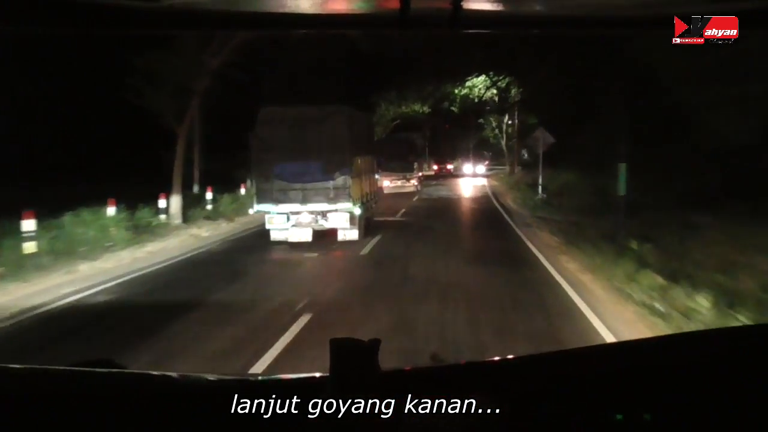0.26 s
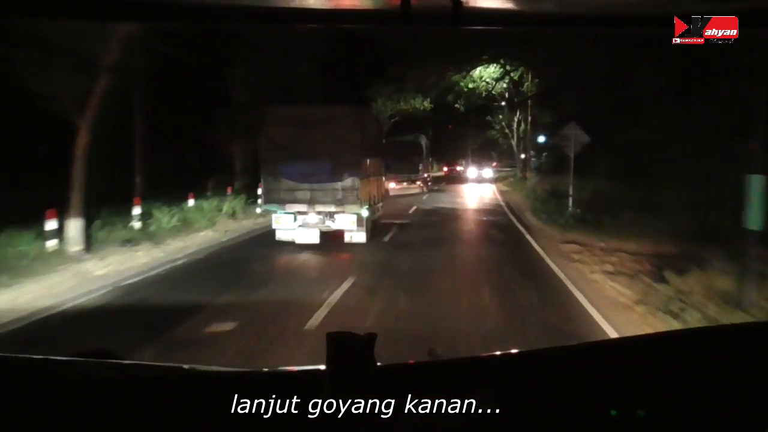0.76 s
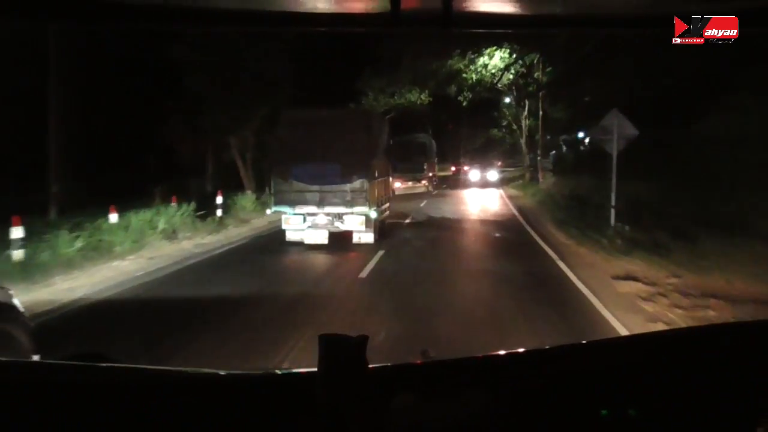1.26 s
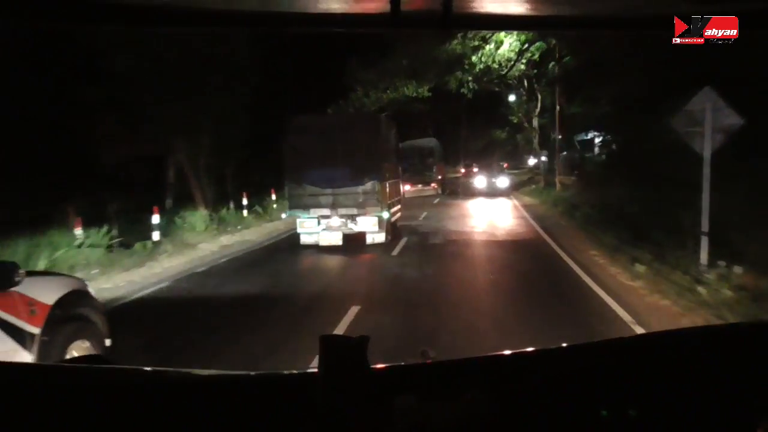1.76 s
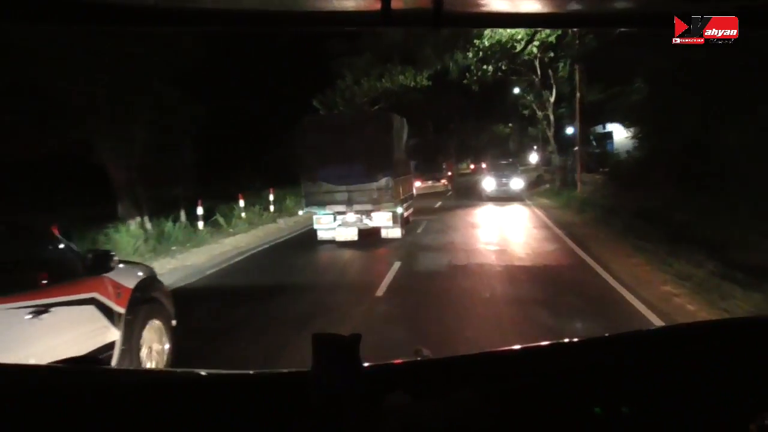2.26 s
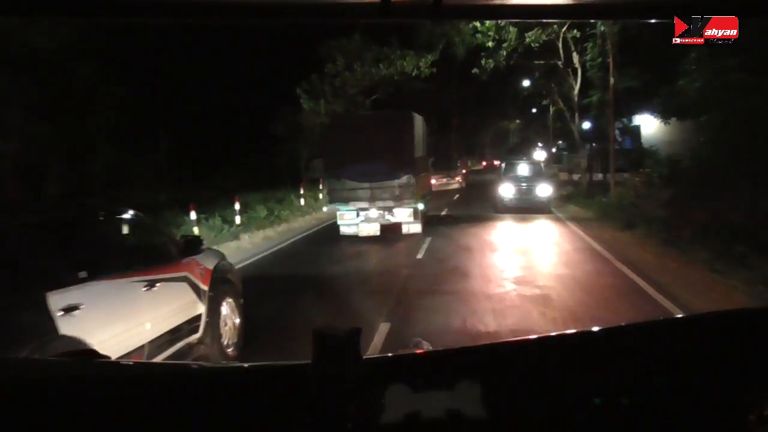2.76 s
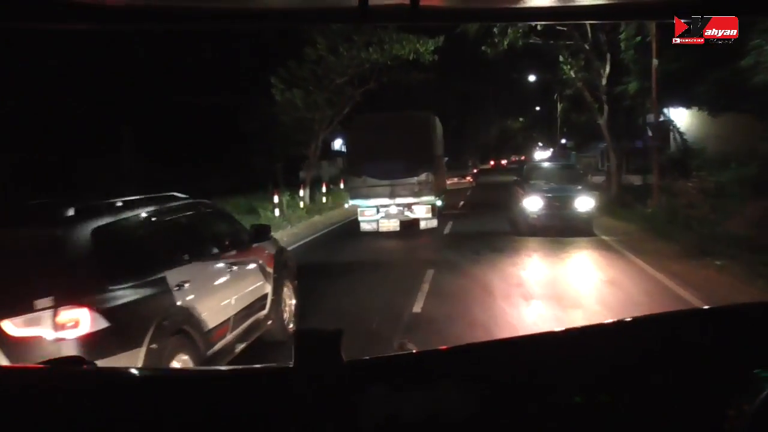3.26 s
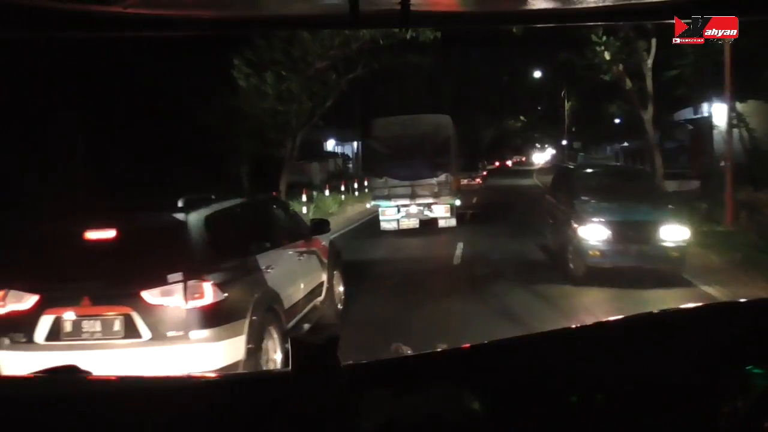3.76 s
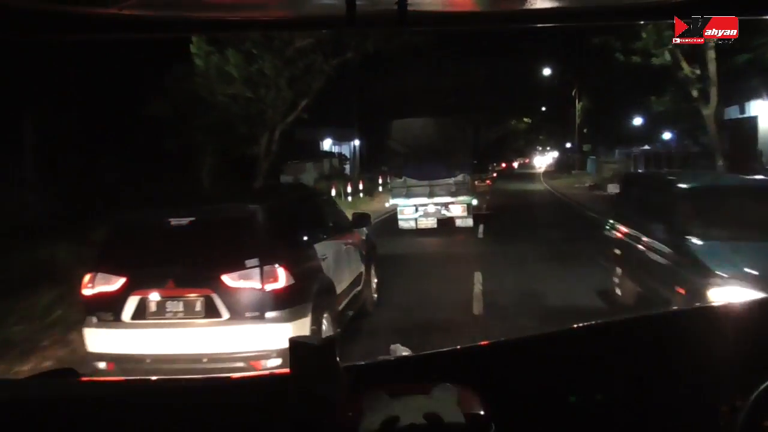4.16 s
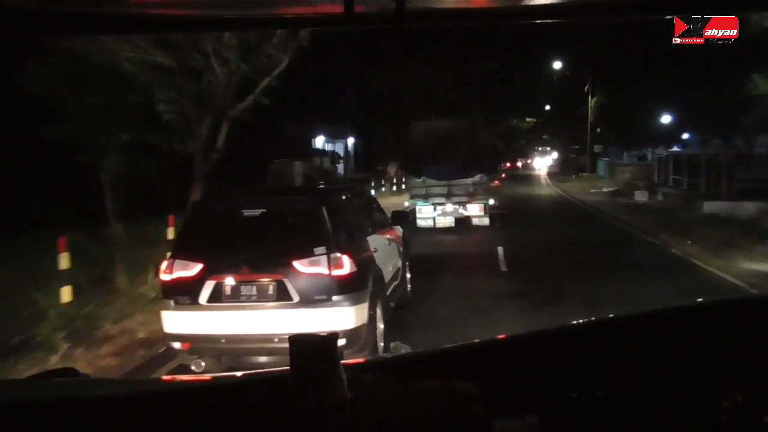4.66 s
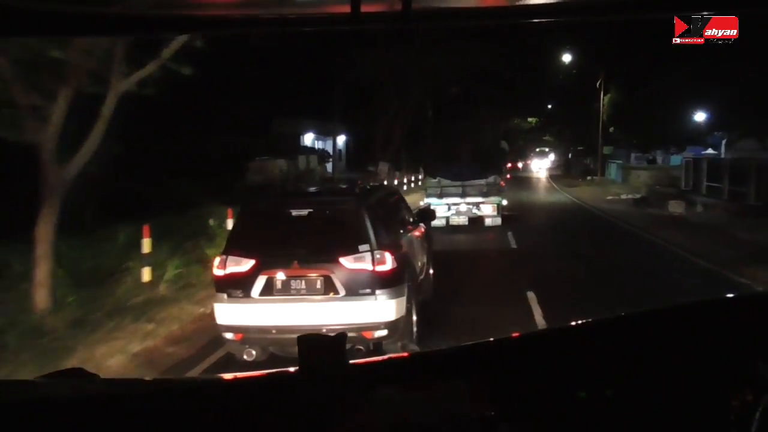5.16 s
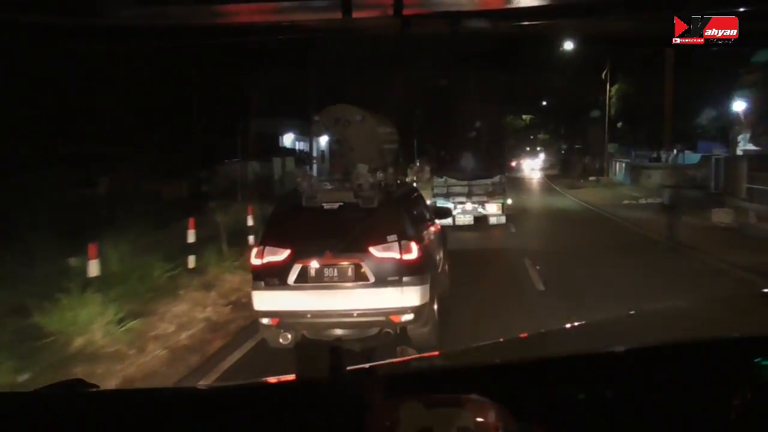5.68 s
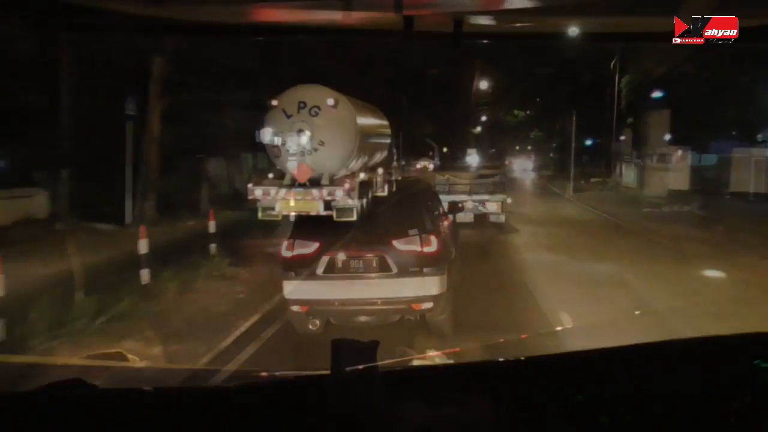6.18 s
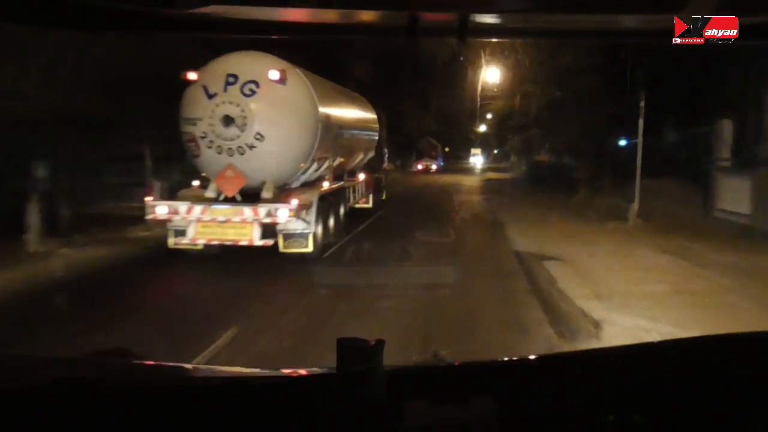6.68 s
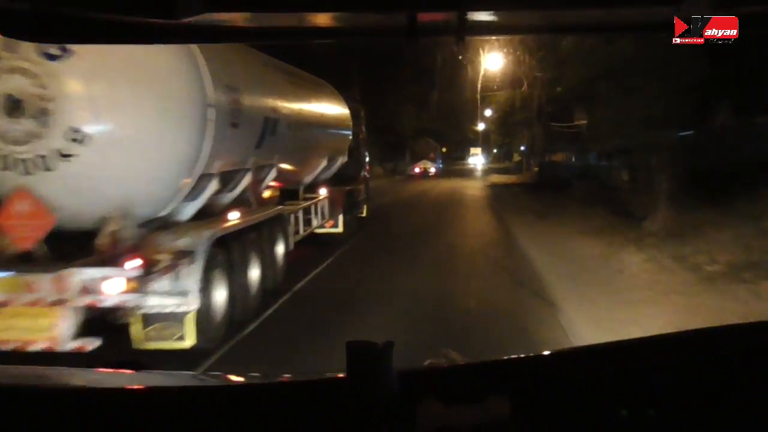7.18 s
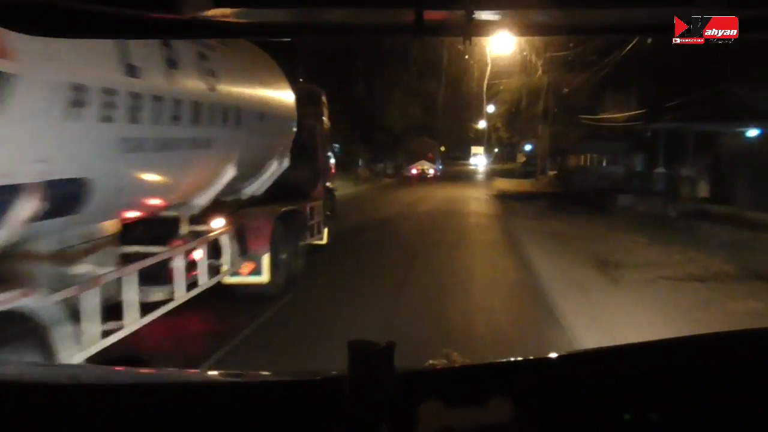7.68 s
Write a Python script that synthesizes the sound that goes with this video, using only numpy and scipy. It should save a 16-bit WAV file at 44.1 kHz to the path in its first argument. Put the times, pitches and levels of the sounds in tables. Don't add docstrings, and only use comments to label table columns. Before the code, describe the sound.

Dashboard stereo pickup in a moving bus: muffled low rumble dominates, with engine drone, weak gear whine and soft window hiss. Over it a sharp flasher tick repeats, each followed by a softer release click. Two hard thuds and several plastic cracks come around five seconds; then a crossfade brings a louder, faster stretch with its own ticking, panel drone, a deep jolt and thin snapping pings.

```python
import sys
import numpy as np
from scipy import signal
from scipy.fft import rfft, irfft
from scipy.io import wavfile
from scipy.ndimage import uniform_filter1d

SR = 44100
rng = np.random.default_rng(int(sys.argv[2]) if len(sys.argv) > 2 else 0)


def ratio(d):
    e = np.asarray(d, float) / 20
    return 10 ** e


def master(y):
    cut = np.clip(np.atleast_2d(y).T, -1, 1)
    pcm = np.round(cut * 32767)
    wavfile.write(sys.argv[1], SR, pcm.astype(np.int16))


N = 349713

# start_s, level_db
FLOOR_BOOM = [(0.0, -21.5), (0.09, -21), (0.49, -23), (0.55, -22), (1.06, -24), (1.08, -23.5), (3.64, -27),
              (4.92, -24), (5.3, -26), (6.03, -19.5), (6.23, -20), (6.38, -16.5), (6.89, -17.5),
              (6.93, -14.5), (7.89, -19), (7.93, -16.5)]
# pitch_hz, level_db (per Hz)
FIRST_COLOUR = [(12, -46), (20, -8.5), (86, -6), (100, -7.5), (125, -1.5), (158, -8.5), (192, -6.5),
                (302, -13), (333, -17), (360, -19.5), (397, -21), (650, -26.5), (908, -27.5), (982, -32.5),
                (2200, -57), (2860, -83), (4840, -120)]
SECOND_COLOUR = [(12, -45), (20, -14.5), (127, -3), (192, -3.5), (225, -3), (253, -10.5), (327, -12.5),
                 (360, -18), (405, -16.5), (663, -24.5), (873, -26.5), (963, -30.5), (1240, -36),
                 (1700, -49.5), (2200, -51), (2860, -81), (4840, -120)]
# middle_s, length_s, lift_db
PASSING = [
    (6.6, 0.84, 1),
    (7.35, 0.72, 1.5),
]
# pitch_hz, likeness (1 = same)
LIKENESS = [(30, 0.94), (60, 0.94), (130, 0.99), (290, 0.91), (640, 0.79), (1410, 0.55), (3100, 0.37),
            (6820, 0.11), (15000, -0.18)]
# pitch_hz, left_minus_right_db
LEAN = [(25, 0), (60, -1), (180, -2.5), (550, -2.5), (1650, -1.5), (4970, 0), (15000, -3.5)]
# pitch_hz, level_db (per Hz)
WIND_COLOUR = [(820, 5), (1400, 8.5), (1780, -13), (2260, 5), (2670, -6.5), (3430, 0), (4170, -6.5),
               (6000, -31), (7000, -19), (9100, -46), (15400, -120)]
# middle_s, length_s, lift_db
GUSTS = [
    (0, 0.33, -3),
    (1.8, .7, 1.5),
    (3.6, 1.7, 5.5),
    (5.151, 0.68, 4),
    (6.35, 1, 2.5),
]
# pitch_hz, level_db (per Hz)
SIZZLE_COLOUR = [(2940, -3.5), (5000, -1.5), (5710, -5), (6520, -5), (6830, -5.5), (7440, -2.5),
                 (11100, -2), (14600, -10.5), (15500, -17.5)]
# middle_s, length_s, lift_db
SHAKES = [(0, 0.46, 2), (1.197, .35, 6.5), (1.453, 0.33, -4.5), (1.703, 0.43, 5), (1.896, 0.45, 8),
          (2.303, 0.34, -0.5), (2.999, 1, 5.5), (3.555, 1, 7), (3.836, 0.49, 2.5), (4.067, 0.52, 6),
          (5.1, 0.92, 0.5), (5.6, 0.37, -6.5), (5.95, .5, -1.5), (6.332, 0.94, 4), (7.02, 0.34, 4)]
# start_s, pitch_hz, level_db
FIRING = [(0, 131.7, -30), (.5, 126, -36), (1, 129, -26), (1.5, 127.2, -26), (2, 122, -31), (2.5, 119, -28),
          (3, 118, -28.5), (3.15, 117.9, -36), (4.1, 125.9, -36), (4.8, 127.1, -37.5), (5.6, 124.3, -42),
          (6.2, 128.1, -26), (6.5, 120, -26.5), (6.85, 126, -32.5), (7.4, 138, -33), (7.93, 128, -35)]
# start_s, pitch_hz, level_db
GEARS = [(0, 301, -33), (.25, 284.7, -29.5), (.35, 282.3, -53), (.55, 277.7, -34), (.9, 263.6, -37.5),
         (1.15, 260, -31.5), (1.5, 283.5, -36), (1.8, 298.6, -29), (2.1, 312.6, -50), (2.6, 304, -46),
         (2.7, 303.4, -38.5), (2.9, 302, -44), (3.1, 301.8, -31), (3.3, 303, -41), (3.55, 304.4, -37),
         (3.7, 305, -40.5), (3.8, 308, -36.5), (4.0, 314, -38), (4.25, 314, -35.5), (4.4, 286.9, -31.5),
         (4.62, 259, -34), (4.7, 288, -40), (5.2, 286.4, -36.5), (5.6, 287, -29), (6.0, 286.5, -35.5),
         (6.4, 284.7, -30), (6.7, 283.2, -33.5), (7.2, 278.8, -33.5), (7.93, 298.2, -32)]
# start_s, pitch_hz, level_db
TREAD = [(.3, 900, -56), (1.8, 900, -54), (2.5, 908, -56), (3.1, 914, -53), (3.7, 908, -54),
         (4.4, 905, -57), (4.8, 900, -60)]
# start_s, end_s, pitch_hz, level_db
PANELS = [(0, 0.363, 227, -30), (1.0, 2.25, 230, -38), (.45, 0.77, 120, -25), (2.5, 3.95, 199, -33.5),
          (5.78, 5.93, 215, -25.5), (6.3, 6.55, 225, -21), (6.55, 6.85, 228, -26), (6.85, 7.15, 227, -22.5),
          (7.15, 7.93, 227, -29), (7.2, 7.4, 180, -30), (6.3, 6.5, 183, -37), (6.65, 6.85, 150, -27),
          (7.55, 7.93, 175, -29.5), (4.85, 5.2, 215, -35.5)]
# start_s, peak_db, dull_part_db,
# fade_s (time to fall 60 dB)
RATTLES = [(0, -41.5, 6, .15), (0.2422, -45.5, 12, 0.17), (0.4638, -48, 10, 0.13), (1.1309, -34, -15, 0.06),
           (1.15, -40, -20, .5), (1.27, -38.5, -8, 0.35), (1.6654, -32.5, -3, 0.16),
           (1.6815, -31, -10, .15), (3.0624, -40, -2, .12), (4.083, -36, -19, 0.15),
           (4.9193, -24, -3, 0.16), (5.1761, -26, -3, 0.097), (5.183, -24, 0, 0.17), (5.3743, -44, 8, .1),
           (5.729, -35, -2, 0.26), (5.7613, -37, 6, 0.12), (5.942, -28.5, -3, 0.15),
           (6.122, -28, -10, 0.16), (6.2855, -19.5, -28, 0.091), (6.5378, -38.5, 10.5, 0.21),
           (6.6588, -41, -25, 0.15), (7.0243, -36, 2, 0.14), (7.045, -35.5, 4, 0.2), (7.2559, -35, 2, 0.22),
           (7.3727, -37, 3, 0.41), (7.668, -37, -16, 0.15), (7.8634, -38, -7, 0.095)]
# pitch_hz, level_db
RATTLE_BRIGHT = [(5500, -23.5), (6300, -15), (7000, -9), (8500, -8.5), (10500, -7.5), (13000, -15),
                 (14500, -23), (15600, -30)]
# pitch_hz, level_db
RATTLE_DULL = [(400, -20), (700, 8), (1500, -0.5), (2500, -5), (3900, -1), (5200, -3.5), (6500, -19)]
# start_s, peak_db, pitch_hz
KNOCKS = [
    (.25, -46, 1330),
    (.47, -47, 1330),
    (.47, -46, 1080),
    (.9, -44, 1330),
    (.9, -54, 1950),
]
# start_s, peak_db, #
# centre_hz, fade_s (time to fall 60 dB)
THUDS = [(.02, -52, 4400, .8), (0, -46, 1800, .2), (.355, -46.5, 1900, 0.35), (1.879, -41.5, 1100, 0.21),
         (4.006, -41, 930, 0.17), (4.917, -26, 680, 0.12), (4.917, -38, 4000, .14), (4.917, -39, 1300, .18),
         (5.178, -29, 740, 0.17), (5.176, -41, 1200, 0.15), (5.177, -35, 7100, 0.14),
         (5.176, -39.5, 3000, 0.13), (7.29, -26, 760, .35), (6.55, -31, 720, .4), (7.37, -33, 1040, 0.78),
         (7.33, -17, 80, .6)]
# middle_s, length_s, pitch_hz, level_db
BOOMS = [(.17, .16, 130.3, -25), (4.17, .2, 128.6, -29.5), (4.38, .16, 122, -27), (4.56, .18, 123.1, -26),
         (4.8, .16, 128, -22.5), (5.0, .24, 127.8, -27), (5.5, .2, 125.4, -28.5), (5.7, .16, 128.4, -23.5),
         (6.0, .18, 132, -21.5), (7.05, .24, 125, -20), (7.28, .16, 136.6, -19), (7.47, .16, 136.5, -23)]
# first_pull_s, flashes, left_minus_right_db
FLASHERS = [
    (.2559, 11, -2.5),
    (5.8608, 4, -5.5),
]
PULL_FORCE = [-1.5, -0.95, 0, 0.72, -0.93, -0.64, 1.05, -1.1, 0.56, -0.13, 0.17, 0.53, 1.6, -0.29, -1.6]
DROP_FORCE = [0, 0, .5, -0.38, 0, 0.056, 0.97, 0.94, 0.34, 0, 0, -0.012, -0.12, 0.068, 0]
# pitch_hz, level_db, fade_s (time to fall 60 dB)
PULL_MODES = [(3400, -10.5, .1), (3468, -8.5, .12), (3575, -8, .11), (3655, -3, .13), (3765, -1.5, .09),
              (3865, -1.5, .1), (3917, -10, .1), (4064, -4, .105), (4198, -6, .12), (4335, -10, .1),
              (4393, -7.5, .12), (4605, -13.5, .1), (4866, -17, .095), (12105, -12.5, .06)]
DROP_MODES = [(2490, -2.5, .07), (2735, -5, .06), (3245, -3, .08), (3489, -6, .07), (3660, -6, .09),
              (3769, 0, .13), (3845, 0, .13), (4270, -6, .06), (4760, -8, .05), (6290, -9, .06),
              (6500, -6, .06), (7230, -9, .06), (7746, -9, .06), (12100, -5, .06)]
# delay_s, level_db
PULL_BOUNCES = [(0, 11), (.00435, 14), (.00826, 8), (.01257, 14.5), (.02045, 5), (.02742, 8), (.0389, 2)]
DROP_BOUNCES = [(0, 12), (.0061, 5), (.01214, 8.5), (.0164, 8), (.0233, 2), (.03, -2)]
# pitch_hz, level_db
PULL_BUZZ = [(3000, -20), (3600, 4), (4600, -1), (5500, -14), (6100, -26), (6900, -10.5), (8200, -4.5),
             (9500, -12), (10800, -14), (12000, -8), (12700, -30)]
DROP_BUZZ = [(2200, -14), (3700, -5), (5400, -19), (6500, -7), (7700, -10), (10500, -14), (12000, -14),
             (12800, -38)]
# start_s, peak_db, left_minus_right_db
SNAPS = [(1.2815, -26, 0), (3.5483, -23, 1), (3.565, -28, 0), (4.4926, -18.5, 2), (4.769, -20, 2),
         (5.1335, -21, 0.0), (5.321, -28, 0.0), (5.4844, -28, 4), (5.6396, -33, 0.5)]
# pitch_hz, level_db
SNAP_COLOUR = [(1000, -25), (1700, 2.5), (5000, -1), (9000, -4.5), (14500, -14), (15600, -30)]
# start_s, peak_db, left_minus_right_db
PINGS = [
    (6.915, -22, 0.0),
    (6.9576, -29, -2.0),
    (7.0848, -35, -2.5),
    (7.209, -26, -2.0),
    (7.266, -32, -1.0),
]
# from_hz, to_hz, level_db (against the tick)
MASKED = [(5750, 6350, -27), (12550, 13100, -30), (13100, 13800, -29), (13800, 14500, -37)]

FADE_S = (4.4, 6.86)


def evened(x):
    return x / np.sqrt(np.mean(x ** 2) + 1e-20)


def read(points, hz):
    f, value = np.transpose(points)
    return np.interp(np.log(hz + 1), np.log(f + 1), value)


def curve(rows, t):
    s, *columns = np.transpose(rows)
    return [np.interp(t, s, c) for c in columns]


def blend(pair, t):
    return np.interp(t, FADE_S, pair)


def humps_db(rows, t):
    total = 0
    for s, length, db in rows:
        total = total + db * np.cos(np.pi * np.clip((t - s) / length, -.5, .5)) ** 2
    return total


def add(mix, s, sound):
    part = mix[:, round(s * SR):][:, :sound.shape[1]]
    part += sound[:, :part.shape[1]]


def panned(x, pan_db):
    return x * ratio(np.array([[pan_db / 2], [-pan_db / 2]]))


def aside(x, count):
    return np.array([x[0], np.roll(x[1], count)])


def noise(colour_db, size, patchy_db, flicker_db):
    hop = size // 4
    frames, hz = N // hop + 5, np.fft.rfftfreq(size, 1 / SR)
    a, b, c, d, patches = rng.standard_normal((frames, len(hz), 5)).T
    patches = uniform_filter1d(patches, size=4, axis=0)
    patches = evened(uniform_filter1d(patches, size=6, axis=1))
    flicker = evened(uniform_filter1d(rng.standard_normal(frames), size=3))
    same = np.clip(read(LIKENESS, hz), -1, 1)[:, None]
    lean = read(LEAN, hz)[:, None]
    left = a + 1j * b
    right = same * left + np.sqrt(1 - same ** 2) * (c + 1j * d)
    z = np.array([left * ratio(lean / 2), right * ratio(-lean / 2)])
    gain = ratio(colour_db(hz, np.arange(frames) * hop / SR))
    gain /= np.sqrt((gain ** 2).mean(0))
    z = z * gain * ratio(patchy_db * patches + flicker_db * flicker)
    return evened(signal.istft(z, nperseg=size, noverlap=size - hop)[1][:, :N])


def road():
    def colour_db(hz, t):
        hz = hz[:, None]
        later = np.clip((t - FADE_S[0]) / (FADE_S[1] - FADE_S[0]), 0, 1)
        swell_db = curve(FLOOR_BOOM, t)[0] - blend((-24.5, -17), t)
        roar_db = blend((-11.5, -9.5), t) - 0.34 * swell_db
        deep_db = blend((-14, -6.5), t) - 0.36 * swell_db
        base = read(FIRST_COLOUR, hz) * (1 - later) + read(SECOND_COLOUR, hz) * later
        rumble = 0.76 * (deep_db + 5.5) * np.clip((115 - hz) / 30, 0, 1)
        roar = (0.54 * (roar_db + 14) + humps_db(PASSING, t)) * np.clip((hz - 300) / 100, 0, 1)
        return base + rumble + roar
    level_db = curve(FLOOR_BOOM, np.arange(N) / SR)[0] - 0.64
    return ratio(level_db) * noise(colour_db, size=2048, patchy_db=1.4, flicker_db=0.78)


def hiss(calm_db, humps, colour, lift_db, patchy_db, flicker_db):
    t = np.arange(N) / SR

    def colour_db(hz, t):
        return read(colour, hz)[:, None] + 0 * t
    body = noise(colour_db, size=256, patchy_db=patchy_db, flicker_db=flicker_db)
    return ratio(blend(calm_db, t) + humps_db(humps, t) + lift_db) * body


def wind():
    return hiss((-63.5, -56), GUSTS, WIND_COLOUR, lift_db=7.1, patchy_db=1.6, flicker_db=0.82)


def trim_sizzle():
    return hiss((-58.5, -52), SHAKES, SIZZLE_COLOUR, lift_db=0.37, patchy_db=1.8, flicker_db=0.57)


def hum(rows, waver_db, drift):
    t = np.arange(rows[0][0], rows[-1][0], 1 / SR)
    hz, level_db = curve(rows, t)
    knots = rng.standard_normal((2, int(len(t) / SR * 25) + 2))
    sway, swell = (np.interp(t - t[0], np.arange(len(k)) / 25, k) for k in knots)
    tone = np.sqrt(2) * np.sin(2 * np.pi * np.cumsum(hz * (1 + drift * sway)) / SR)
    soft_ends = signal.windows.tukey(len(t), min(.12 * SR / len(t), 1))
    return t[0], panned(tone * ratio(level_db + waver_db * swell) * soft_ends, -1.2)


def hums():
    out = np.zeros((2, N))
    add(out, *hum(FIRING, 2.8, 0.012))
    add(out, *hum(GEARS, 2.4, 0.005))
    add(out, *hum(TREAD, 4.4, 0.0164))
    for start, end, hz, db in PANELS:
        add(out, *hum([(start, hz, db), (end, hz, db)], 0.71, 0.0091))
    return out


def rattles():
    out, t = np.zeros((2, N)), np.arange(8192) / SR
    hz = np.fft.rfftfreq(len(t), 1 / SR)
    for s, peak_db, dull_db, t60 in RATTLES:
        z = rfft(rng.standard_normal((3, len(t))))
        both = z[:2] + 0.45 * z[2]
        bright = evened(irfft(both * ratio(read(RATTLE_BRIGHT, hz))))
        dull = evened(irfft(both * ratio(read(RATTLE_DULL, hz))))
        fall = ratio(-60 * t / max(t60, .01)) + ratio(-8.5 - 60 * t / 0.011)
        fall = fall * np.minimum(t / .002, 1)
        add(out, s, panned(ratio(peak_db - 11.5) * (bright + ratio(dull_db) * dull) * fall, -2))
    return out


def dashboard_knocks():
    out, t = np.zeros((2, N)), np.arange(8192) / SR
    for s, peak_db, hz in KNOCKS:
        tone = np.sin(2 * np.pi * hz * t) * np.minimum(t / 0.0016, 1)
        add(out, s, panned(ratio(peak_db - 60 * t / 0.23) * tone, 1.5))
    return out


def thuds():
    out, t = np.zeros((2, N)), np.arange(16384) / SR
    hz = np.fft.rfftfreq(len(t), 1 / SR) + 1
    for s, peak_db, centre_hz, t60 in THUDS:
        z = rfft(rng.standard_normal((3, len(t))))
        band = np.exp(-(np.log(hz / centre_hz) / 0.37) ** 2)
        body = evened(irfft((0.36 * z[:2] + z[2]) * band))
        add(out, s, ratio(peak_db - 60 * t / t60) * body * np.minimum(t / (0.054 * t60), 1))
    return out


def booms():
    out = np.zeros((2, N))
    for s, length, hz, db in BOOMS:
        t = np.arange(0, length, 1 / SR)
        swell = ratio(db + 3.5) * np.sin(np.pi * t / length) ** 2
        tone = np.sin(2 * np.pi * (hz * t + rng.random()))
        add(out, s - length / 2, panned(swell * tone, -1.5))
    return out


def flashes():
    pull_db, drop_db = (-23.5, -25), (-34, -34.5)
    blink_s, lit_s = (.62497, .6244), .3247
    early, early_s = (8, 12), .023
    swap_s = (5.54, 6.64)
    pulls, drops = [], []
    for k, (first, count, pan_db) in enumerate(FLASHERS):
        for s in first + blink_s[k] * np.arange(count):
            i = len(pulls)
            off = s + lit_s - early_s * (i in early)
            near_db = 10 * np.log10(np.interp([s, off], swap_s, [1 - k, k]) + 1e-6)
            drops.append((off, drop_db[k] + DROP_FORCE[i] + near_db[1], pan_db + 0.5))
            pulls.append((s, pull_db[k] + PULL_FORCE[i] + near_db[0], pan_db))
    return pulls, drops[:-1]


def relay(events, modes, bounces, buzz, buzz_db, spread_db, slop):
    out, t = np.zeros((2, N)), np.arange(4096) / SR
    hz, mode_db, t60 = np.array(modes)[:, :, None].transpose(1, 0, 2)
    buzz_gain = ratio(read(buzz, np.fft.rfftfreq(len(t), 1 / SR)))
    rise = np.sin(np.pi / 2 * np.minimum(t / .0011, 1)) ** 2
    for s, peak_db, pan_db in events:
        tick = np.zeros(2 * len(t))
        for late, db in bounces:
            chance_db = spread_db * rng.standard_normal(hz.shape)
            turn = slop * rng.standard_normal(hz.shape)
            fall = ratio(mode_db - chance_db ** 2 / 10 - 60 * t / t60)
            ring = (fall * np.sin(2 * np.pi * (hz * t + turn))).sum(0)
            fizz = evened(irfft(rfft(rng.standard_normal(len(t))) * buzz_gain))
            fizz = fizz * ratio(buzz_db - 60 * t / 0.11)
            tick[round(late * SR):][:len(t)] += ratio(db) * (ring + fizz) * rise
        add(out, s - .001, panned(ratio(peak_db - 13.0) * tick / tick[:2200].std(), pan_db))
    return out


def cab(x):
    t, mirror = np.arange(8000) / SR, .8
    taps = rng.choice([-1., 1.], (2, len(t))) * (rng.random((2, len(t))) < .05)
    taps = taps * ratio(-60 * t / .13) * (t > .002)
    taps[1] = np.sqrt(1 - mirror ** 2) * taps[1] - mirror * taps[0]
    echoes = signal.fftconvolve(x, taps / np.linalg.norm(taps[0]), axes=1)[:, :N]
    return x + ratio(-5.5) * echoes


def indicator():
    pulls, drops = flashes()
    ticks = relay(pulls, PULL_MODES, PULL_BOUNCES, PULL_BUZZ, buzz_db=-6.5, spread_db=1.5, slop=.08)
    ticks = ticks + relay(drops, DROP_MODES, DROP_BOUNCES, DROP_BUZZ, buzz_db=-3, spread_db=2, slop=.1)
    return aside(cab(ticks), -1)


def snaps(events, colour):
    out, t = np.zeros((2, N)), np.arange(512) / SR
    gain = ratio(read(colour, np.fft.rfftfreq(len(t), 1 / SR)))
    pulse = np.roll(irfft(gain), 20) * np.minimum(t / .0004, 1)
    for s, peak_db, pan_db in events:
        splinter = evened(irfft(rfft(rng.standard_normal(len(t))) * gain))
        splinter = splinter * ratio(-18 - 60 * t / 0.0079) * np.minimum(t / 0.00034, 1)
        add(out, s, panned(ratio(peak_db - 2.5) * (pulse / pulse.max() + splinter), pan_db))
    return out


def scene():
    mix = road() + wind() + trim_sizzle() + hums()
    mix = mix + rattles() + dashboard_knocks() + thuds() + booms() + indicator()
    return mix + aside(snaps(SNAPS, SNAP_COLOUR) + snaps(PINGS, RATTLE_BRIGHT), 1)


def masked(x):
    hz, t, z = signal.stft(x, SR, nperseg=1024)
    power = (abs(z) ** 2).mean(0)
    loud = power[(hz > 3300) & (hz < 5000)].mean(0)
    keep = np.ones(power.shape)
    for lo, hi, under_db in MASKED:
        band = (hz > lo) & (hz < hi)
        keep[band] = power[band].mean(0) > loud * ratio(2 * under_db)
    return signal.istft(z * keep, SR, nperseg=1024)[1][:, :N]


def band_limit(x):
    return signal.sosfilt(signal.butter(12, 15480, fs=SR, output="sos"), x)


def record(dry):
    low_pass = signal.firwin(1023, 15480, window=("kaiser", 9), fs=SR)
    limited = signal.oaconvolve(dry, low_pass[None], "same")
    mix = masked(limited) * np.minimum(np.arange(N) / 60, 1)
    return band_limit(mix)


dry = scene()
out = record(dry)
master(out)
```